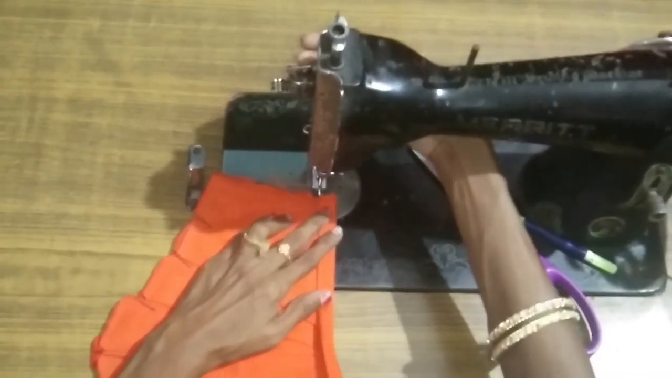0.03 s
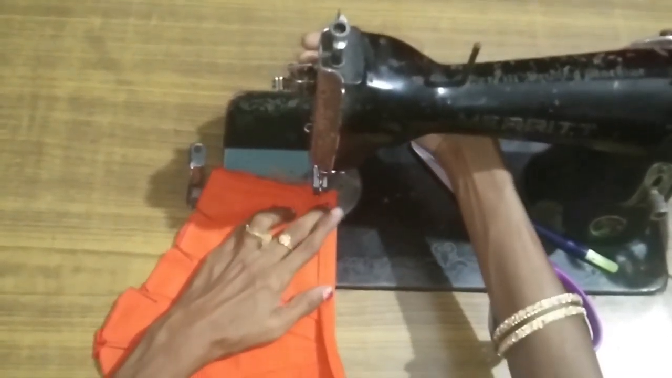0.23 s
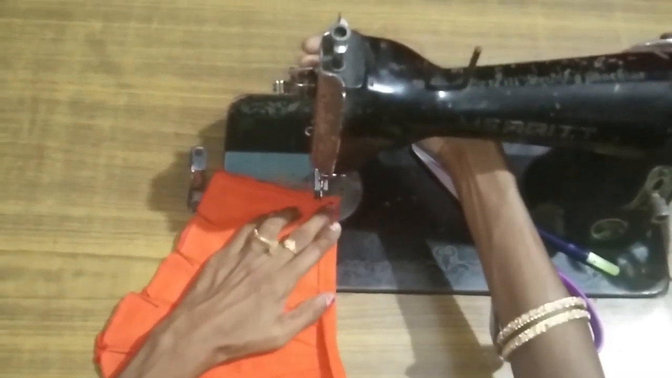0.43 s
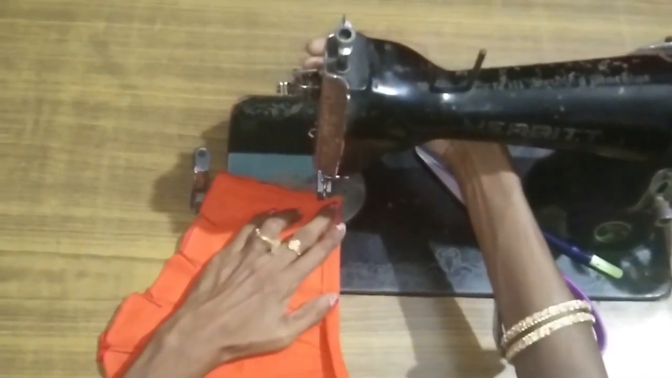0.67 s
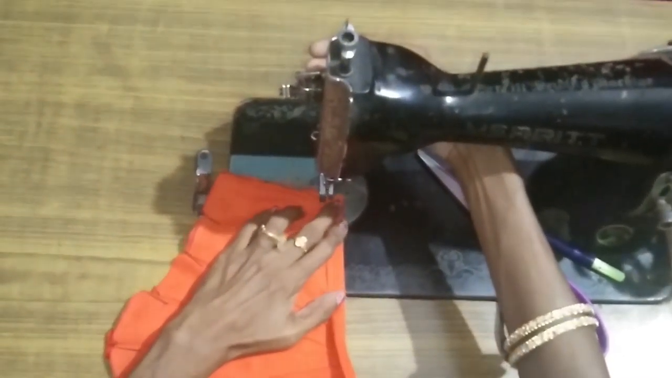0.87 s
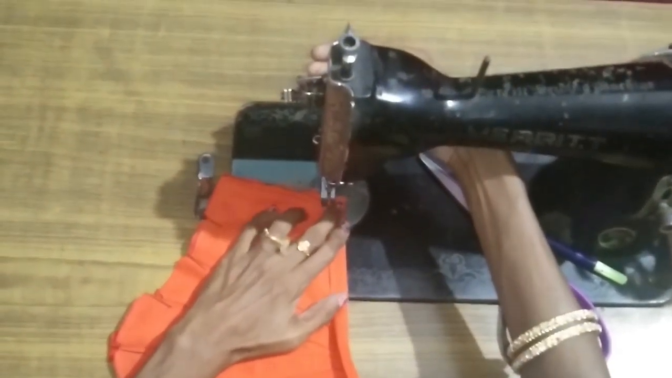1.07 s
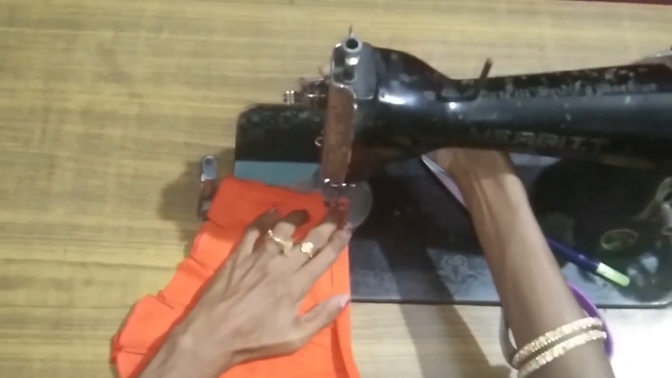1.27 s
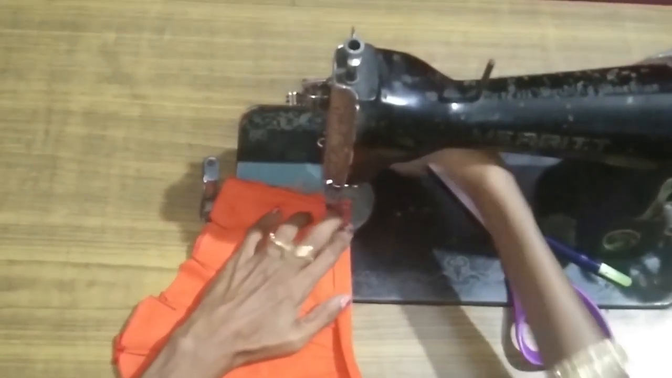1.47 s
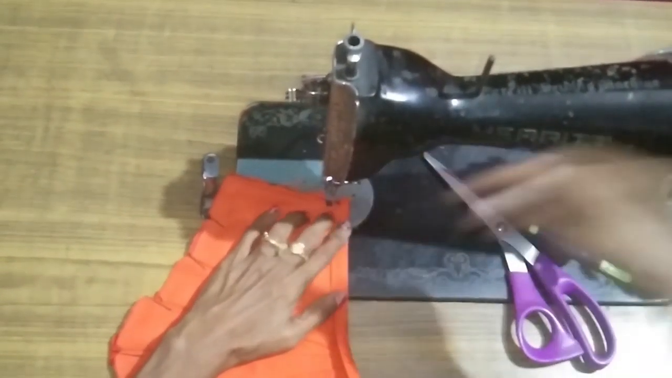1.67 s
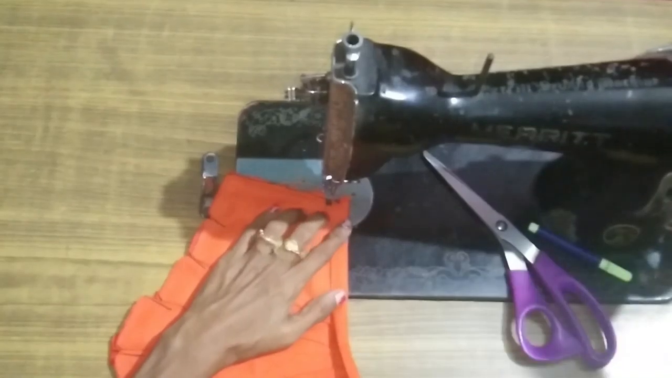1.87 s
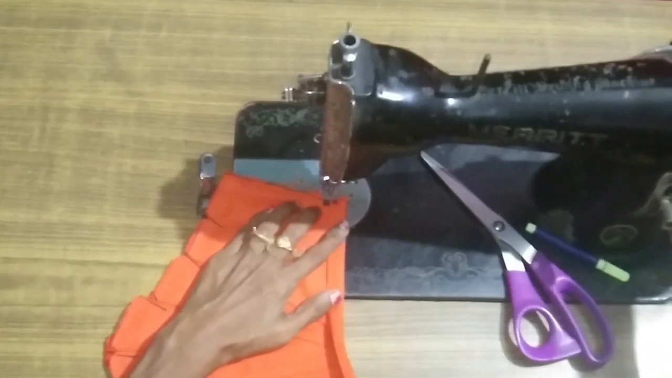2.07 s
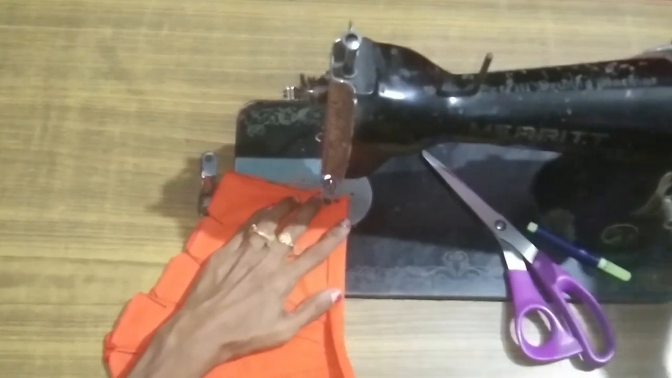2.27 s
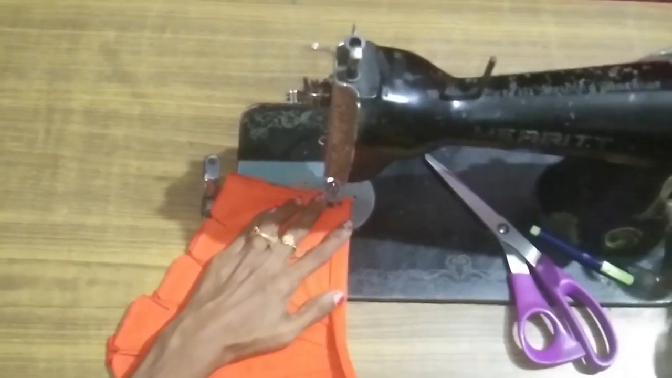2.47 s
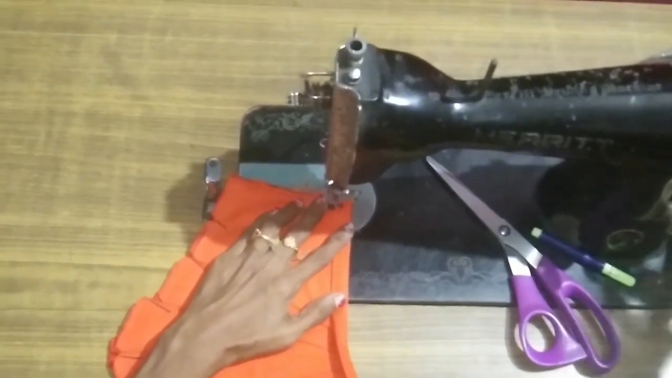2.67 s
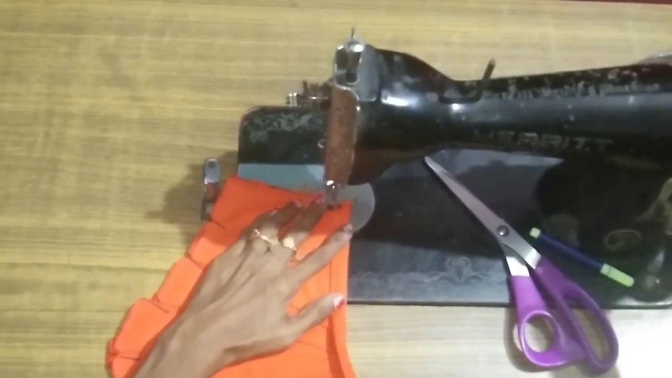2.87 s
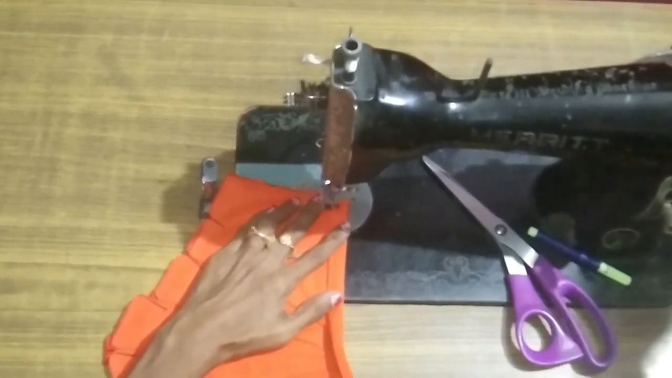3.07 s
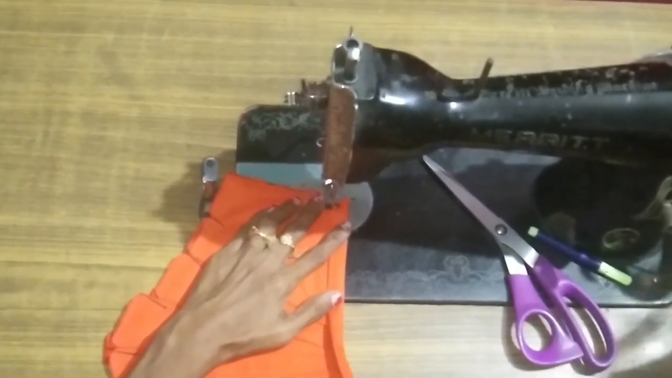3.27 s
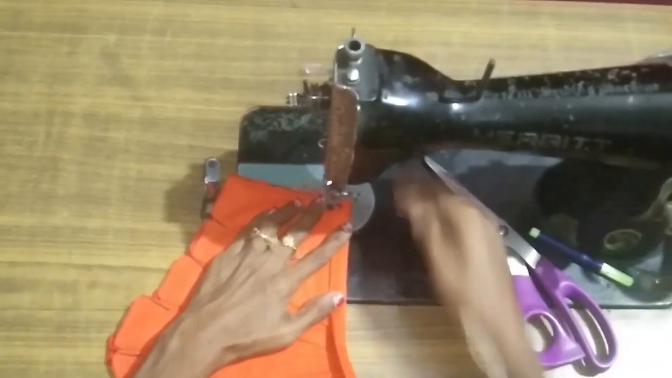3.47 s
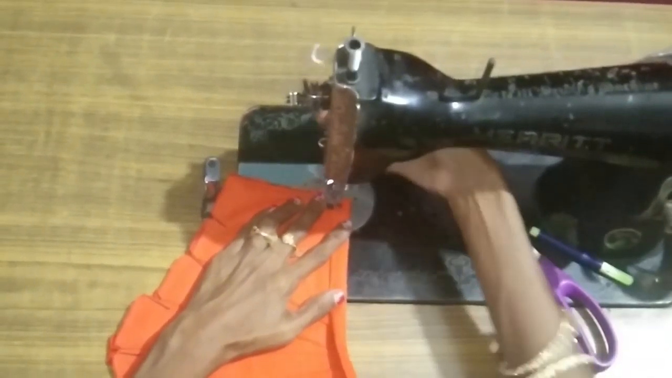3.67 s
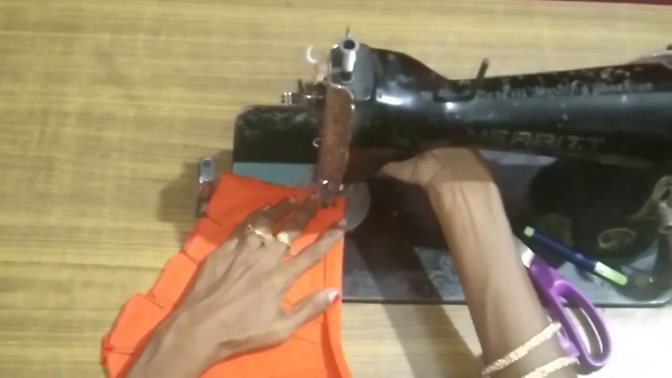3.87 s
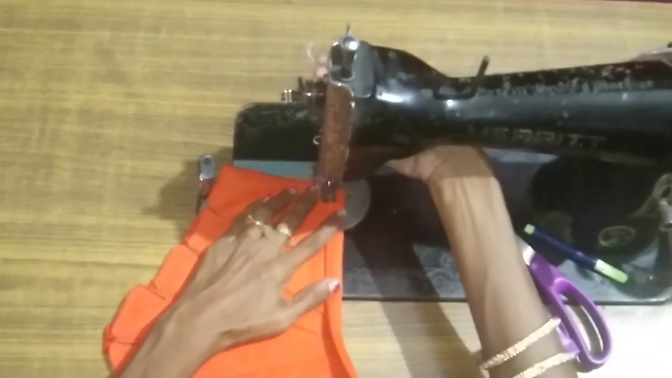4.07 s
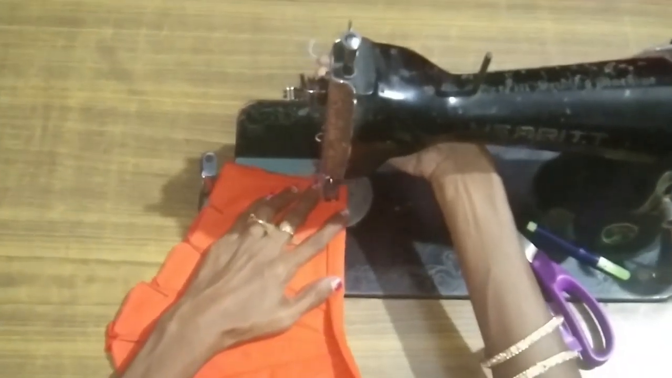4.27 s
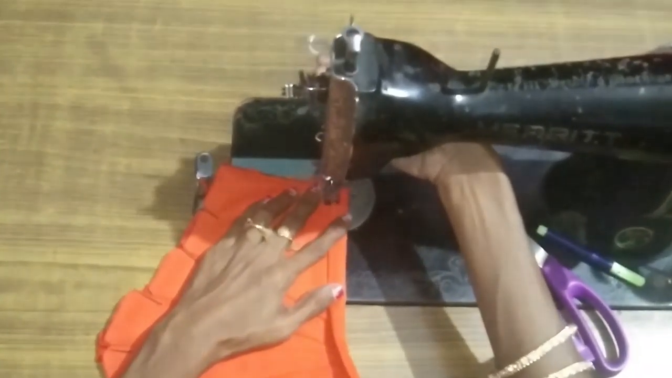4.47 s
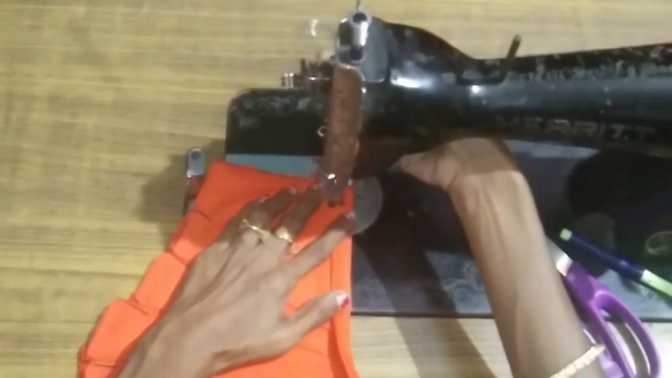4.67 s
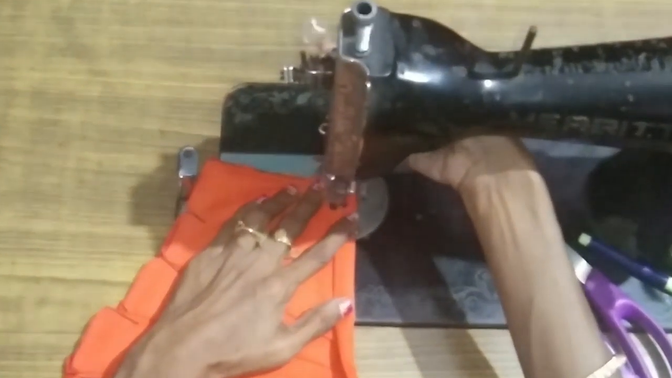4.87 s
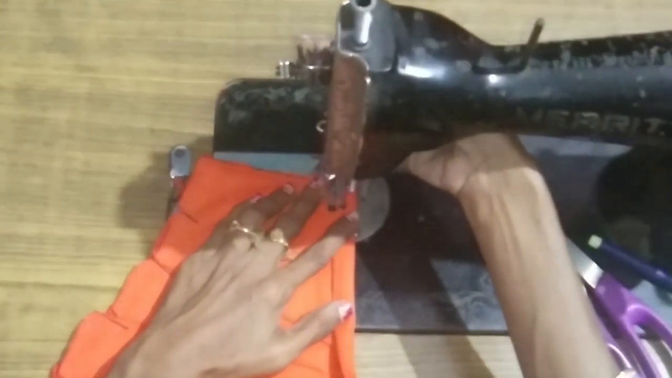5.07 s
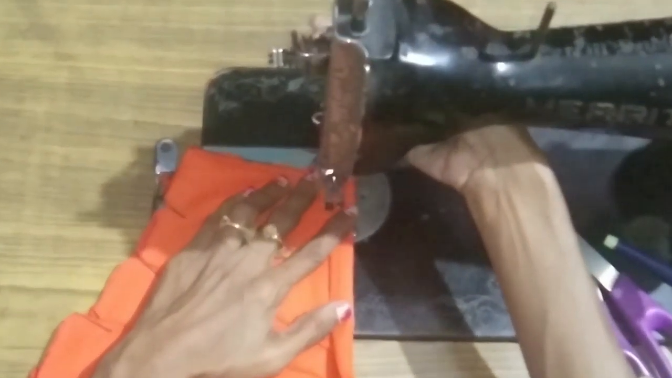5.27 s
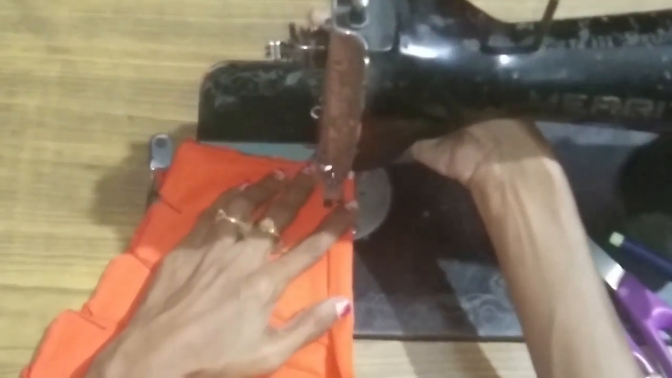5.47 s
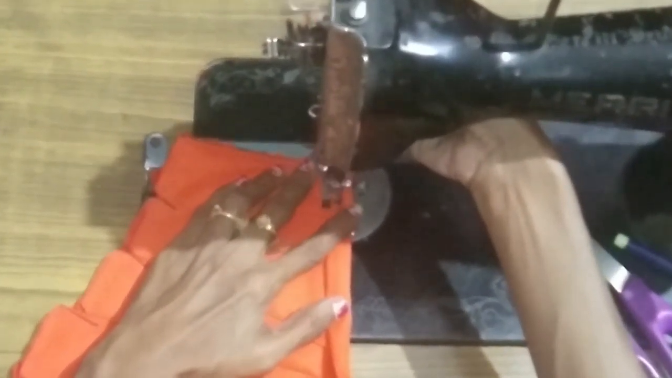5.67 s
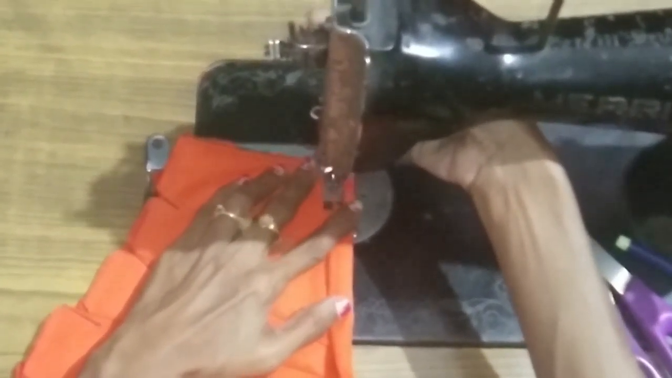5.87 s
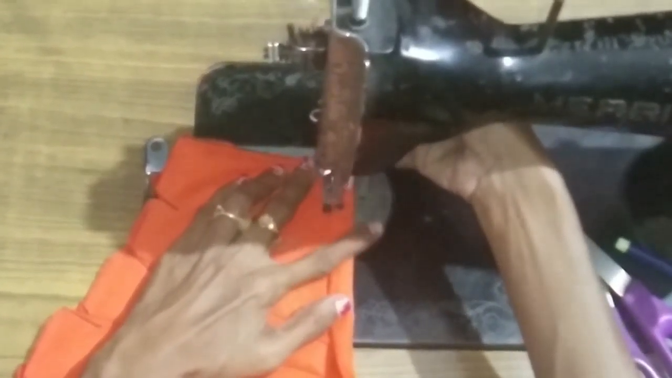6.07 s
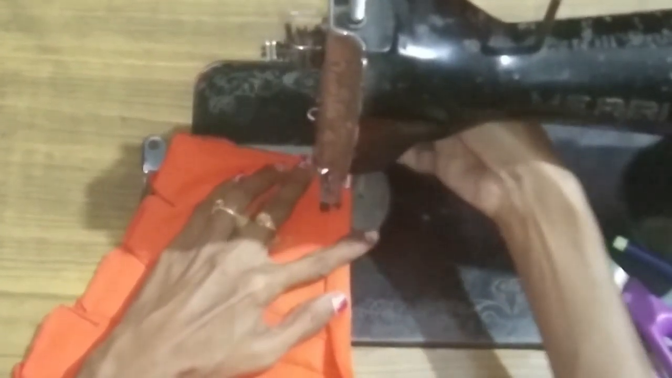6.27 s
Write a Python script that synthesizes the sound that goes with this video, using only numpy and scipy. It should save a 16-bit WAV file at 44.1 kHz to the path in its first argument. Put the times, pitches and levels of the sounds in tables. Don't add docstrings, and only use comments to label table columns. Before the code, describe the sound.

Almost quiet at first: low room tone and tiny brushing sounds. Irregular metal clicks and woody table knocks build, strongest shortly before three seconds. After a slight break in the ambience, a heavy old sewing machine gets going, each stitch a soft thud, sharp clack and softer rattling return, with thin high squeaks early on. It accelerates, then holds an even pace, close-miked with short hard-room reverberation.

```python
import sys
import numpy as np
from scipy import signal
from scipy.fft import rfft, irfft
from scipy.io import wavfile

SR = 44100
rng = np.random.default_rng(int(sys.argv[2]) if len(sys.argv) > 2 else 0)


def unload_wav(signal):
    wavfile.write(
        sys.argv[1],
        SR,
        np.round(np.clip(np.atleast_2d(signal).T, -1, 1) * 32767).astype(np.int16),
    )


def makeup_ratio(level_db):
    decades = np.asarray(level_db, float) / 20
    return 10 ** decades


N = 279594
TIME = np.arange(N) / SR
SCENE_CHANGE_S = 3.172


def at_hz(points, hz):
    table_hz, value = np.transpose(points)
    return np.interp(np.log(hz), np.log(table_hz), value)


def rms_one(x):
    return x / np.sqrt(np.mean(x ** 2) + 1e-20)


def colour(x, spectrum, peaks=(), tilt=((100, 0), (200, 0))):
    hz = np.maximum(np.fft.rfftfreq(4096, 1 / SR), 10)
    db = at_hz(spectrum, hz) + at_hz(tilt, hz)
    for peak_hz, width_hz, peak_db in peaks:
        db = db + peak_db / (1 + (2 * (hz - peak_hz) / width_hz) ** 2)
    cepstrum = irfft(np.log(makeup_ratio(db)))
    cepstrum[1:2048] *= 2
    cepstrum[2049:] = 0
    response = irfft(np.exp(rfft(cepstrum)))
    return signal.fftconvolve(x, response)[:len(x)]


def band(x, low_hz, high_hz):
    edges_hz = [low_hz, min(high_hz, .45 * SR)]
    return signal.sosfilt(signal.butter(2, edges_hz, "band", fs=SR, output="sos"), x)


def ring(x, hz, t60_s):
    r, w = makeup_ratio(-60 / (t60_s * SR)), 2 * np.pi * hz / SR
    return signal.lfilter([0, np.sin(w)], [1, -2 * r * np.cos(w), r * r], x + 1e-18)


def grains(size, per_s, spread_db):
    sizes = makeup_ratio(spread_db * np.minimum(rng.exponential(1, size), 3)) * rng.standard_normal(size)
    return rms_one(sizes * (rng.random(size) < per_s / SR))


def burst(on_s, off_s, db, rise_db_per_s, fall_db_per_s):
    rise_db = rise_db_per_s * np.maximum(on_s - TIME, 0)
    fall_db = fall_db_per_s * np.maximum(TIME - off_s, 0)
    return makeup_ratio(db - rise_db - fall_db)


def add(out, s, x):
    i = round(s * SR)
    out[i:i + len(x)] += x[:N - i]


def blow(rattle_db, swell_s, crack_s):
    t = TIME[:SR // 4]
    age = t / max(1.2 * swell_s, .002)
    swell = (age * np.exp(1 - age)) ** 1.36
    chatter = grains(len(t), 9000, spread_db=1.5)
    crack = signal.lfilter([.78], [1, -.08], rng.choice([-1, 1], len(t))) * np.exp(-t / crack_s)
    return crack + makeup_ratio(rattle_db) * swell * chatter


# frequency [Hz], level [dB per Hz].
IRON = [(290, -36), (500, -3), (1000, -6), (1900, -8), (2200, -3.5), (2900, 0), (3500, 0.5), (3900, -3.5),
        (4800, -4), (7100, 1), (8300, -12.5), (10600, -26), (12700, -35), (14500, -33)]
# frequency [Hz], width [Hz], level [dB].
PARTS = [(650.6, 40, 7), (1226, 290, 4), (1720, 210, 3), (1970, 120, 3), (2216, 110, 4.5), (2666, 210, 2),
         (3000, 33, -12), (3190, 13, 4.5), (3420, 120, 2), (3400, 155, 0.5), (4253, 34, -3.5),
         (4395, 180, 4), (6900, 180, 2), (7570, 47, 2)]


def clacks():
    places = np.zeros((3, N))
    running = whir() * makeup_ratio(-6) * grains(N, 8000, spread_db=0)
    places[0] = colour(running, IRON, PARTS, [(9000, 0), (13500, 1.4)])
    for k, (s, db, dull_db, bright_db, rattle_db, swell_s, top_db) in enumerate(contacts()):
        woken = [(hz, width_hz, max(part_db + 2 * rng.standard_normal(), 0)) for hz, width_hz, part_db in PARTS]
        airy_db = 0.44 * bright_db + 0.43 * rattle_db + 7.5 + top_db
        tilt = [(1300, dull_db + 13.5), (2200, 0.0078), (3800, 0.0059),
                (5500, bright_db + 7), (9000, bright_db + 6.5), (13000, airy_db)]
        force = makeup_ratio(db + 2.81) * blow(rattle_db, swell_s, crack_s=0.0038)
        add(places[k % 3], s, colour(force, IRON, woken, tilt))
    return places


# start [s], peak
# [dB], dull part [dB], bright part [dB], rattle [dB].
EARLY_CLACKS = [(1.4073, -35.5, -16.5, -8.5, -15), (1.5688, -29, -10.5, 1.5, -11.5),
                (2.17, -32, -8.5, -10, -4.5), (2.1894, -42, -2, -6.5, -6.5), (2.4267, -37.5, -15, -1.5, -7),
                (2.4374, -42, -14, -5, -12), (2.474, -30.5, -14, -3, -5), (2.4864, -25.5, -13.5, -10.5, -4),
                (2.5764, -29.5, -9.5, -1.5, -10.5), (2.6962, -17, -16, -5.5, -11),
                (2.7554, -20, -16.5, -12, -4), (2.7698, -19, -16.5, -1, -12), (2.9464, -31, -17, -2, -4),
                (2.9626, -36.5, -12, 5, -11), (3.0022, -25.5, -15, -7, -6), (3.0595, -27.5, -17.5, -22, -12),
                (3.0914, -32.5, -8, -3, -11), (3.1293, -36.5, -18, -12, -1), (3.236, -29, -18, -7, -8),
                (3.2897, -23.5, -16.5, -4.5, -10.5), (3.3994, -50.5, -6.5, 0, 1.5),
                (3.4399, -35, -20, -4.5, -10), (3.572, -38, -17, -5, -3), (3.5826, -23.5, -17, -6, -9)]
# shuttle clack [s], clack [dB], return after [s], return [dB], needle-bar thud [dB].
STITCHES = [(3.6154, -21, .1045, -25.5, -31), (3.8423, -18, .0801, -21.5, -28.5),
            (4.0359, -15.5, .0885, -21.5, -28.5), (4.2408, -15, .0806, -22, -31),
            (4.4324, -17, .0861, -21, -28), (4.6198, -15, .0773, -21.5, -25.5),
            (4.804, -15, .0714, -19.5, -29.5), (4.9703, -14, .0631, -20, -28),
            (5.1264, -15.5, .0689, -20, -29.5), (5.2877, -16.5, .0632, -20.5, -28.5),
            (5.4453, -14.5, .0639, -21, -26), (5.6022, -15, .0667, -20.5, -27.5),
            (5.7613, -14.5, .067, -17.5, -26), (5.9038, -15.5, .0693, -19.5, -26.5),
            (6.0457, -14.5, .0633, -17, -26.5), (6.1903, -17, .0596, -19, -28),
            (6.3324, -16.5, .06, -19, -28)]


def contacts():
    slide = (-20, -6, -4.5, 0.013, -1.5)
    shuttle = (-23, -5.5, -8, 0.0115, -3.5)
    shuttle_return = (-15, -6.5, -3.5, 0.012, 1.5)
    slow_hz, slide_lead_turn = 5.3, 0.097
    rows = [row + (0.012, 0) for row in EARLY_CLACKS]
    for k, ((s, db, after_s, return_db, _), turn_s) in enumerate(zip(STITCHES, turns())):
        fast_hz = max(1 / turn_s - slow_hz, 0)
        dull_db, bright_db, rattle_db, *shape = shuttle
        rows.append((s, db, dull_db, bright_db, rattle_db + 1.2 * fast_hz, *shape))
        soft_db = 1.5 * fast_hz
        dull_db, bright_db, rattle_db, *shape = shuttle_return
        rows.append((s + after_s, return_db - soft_db, dull_db, bright_db, rattle_db + soft_db, *shape))
        if k:
            rows.append((s - slide_lead_turn * turn_s, -24.5 - 7 * fast_hz, *slide))
    return [row for row in rows if row[0] < N / SR]


def turns():
    first_turn_s = 0.31
    s = np.array(STITCHES)[:, 0]
    return np.diff(s, prepend=s[0] - first_turn_s)


def whir():
    s = np.array(STITCHES)[:, 0]
    stitches_per_s = np.interp(TIME, s, 1 / turns())
    return burst(s[1], N / SR, -33 + 2.5 * (stitches_per_s - 5), 200, 0)


# frequency [Hz], level [dB], t60 [s].
BOARD = [(300, -34.5, 0.055), (343.5, 1, 0.073), (398.5, 1.5, 0.052), (659, -4, 0.05)]
# frequency [Hz], level [dB], t60 [s].
LEGS = [(80, 13.5, 0.3), (115, 8, 0.15), (146.4, 11, 0.13), (250, 20, 0.025)]


def thuds():
    out, t = np.zeros(N), TIME[:SR // 3]
    for s, db, knock_hz, deep_db in jolts():
        push = np.exp(-t / 0.00071) / (0.002 * SR)
        tremble = t / 0.019 * np.exp(1 - t / 0.011) * rng.standard_normal(len(t))
        shudder = makeup_ratio(1.5) * band(push + makeup_ratio(-32) * tremble, 295, 1500)
        sound = makeup_ratio(3) * ring(shudder, knock_hz, .045)
        for modes, force in ((BOARD, makeup_ratio(-4.5) * shudder), (LEGS, makeup_ratio(deep_db - 8) * push)):
            for k, (hz, mode_db, t60_s) in enumerate(modes):
                strength = (-1) ** k * makeup_ratio(mode_db + rng.normal(0, 2.5))
                sound = sound + strength * ring(force, hz, t60_s)
        add(out, s, makeup_ratio(db) * sound)
    return band(band(band(out, 73, 1270), 73, 1500), 56, 2600)


# start [s], peak [dB], knock [Hz], deep part [dB].
HAND_THUDS = [
    (1.571, -28, 330, -20),
    (2.189, -32, 328, -15),
    (2.49, -30.5, 460, -33),
    (2.684, -23.5, 440, -13),
    (2.773, -31, 450, -10),
    (3.0, -31, 450, -24),
    (3.099, -36.5, 360, -17),
    (3.229, -36, 438, -16),
    (3.299, -36.5, 353, -24),
]


def jolts():
    thud_lead_turn, jolt_lag_s = 0.157, 0.003
    clack_jolt_db, return_jolt_db = -22, -12
    deep_db = (-13, -8, -13)
    rows = list(HAND_THUDS)
    knocks_hz = 380 + 35 * rng.uniform(-1, 1, (len(STITCHES), 3))
    for (s, db, after_s, return_db, thud_db), turn_s, knock_hz in zip(STITCHES, turns(), knocks_hz):
        times_s = s - thud_lead_turn * turn_s, s + jolt_lag_s, s + after_s + jolt_lag_s
        levels_db = thud_db, db + clack_jolt_db, return_db + return_jolt_db
        rows += zip(times_s, levels_db, knock_hz, deep_db)
    return [row for row in rows if row[0] < N / SR]


# start [s], peak [dB].
SQUEAKS = [
    (2.272, -46),
    (3.86, -34),
    (3.94, -44),
    (4.048, -35),
    (4.138, -35),
]


def squeak():
    squeak_hz, half_width_hz = 6925, 14
    whistle = band(rng.standard_normal(N), squeak_hz - half_width_hz, squeak_hz + half_width_hz)
    catches = sum(burst(s, s, db, rise_db_per_s=900, fall_db_per_s=190) for s, db in SQUEAKS)
    return catches * rms_one(whistle)


# start [s], tick [dB], centre [Hz], width [Hz], rustle after it [dB].
TICKS = [(0.431, -51, 960, 200, -68), (1.179, -49, 6800, 2800, -88), (1.405, -42, 1430, 700, -54),
         (1.571, -36, 930, 200, -68), (1.573, -36, 5070, 2470, -41), (1.752, -49, 7000, 1500, -60),
         (1.753, -62, 14200, 2600, -64), (1.805, -47, 7100, 2980, -56.5), (1.999, -33, 4200, 1090, -58.5),
         (1.9995, -43, 6500, 1200, -72), (2.768, -23, 4580, 250, -43), (3.004, -30, 4550, 250, -47),
         (3.09, -40, 820, 247, -53), (3.44, -50, 1550, 200, -57)]


def ticks():
    out = np.zeros(N)
    for s, db, hz, width_hz, tail_db in TICKS:
        add(out, s, banded_blow(db, hz, width_hz, tail_db - db, swell_s=0.01))
    return out


# start [s], level [dB], centre [Hz], width [Hz], swell [s].
RUSTLES = [(0.0, -64, 1050, 120, .05), (0.0, -66, 3400, 3000, .039), (0.421, -62, 1760, 900, .033),
           (0.592, -56, 5100, 1100, .025), (0.66, -64, 5100, 1100, .07), (0.601, -67, 6960, 2950, .033),
           (1.168, -57.5, 2940, 890, .027), (1.808, -64, 12000, 6000, .011), (1.93, -73, 14200, 2600, .016),
           (2.585, -49, 300, 250, .019), (3.47, -73, 13000, 5000, .03)]


def rustles():
    start_db = -4
    out = np.zeros(N)
    for s, db, hz, width_hz, swell_s in RUSTLES:
        add(out, s, banded_blow(db + start_db, hz, width_hz, -start_db, swell_s))
    return out


def banded_blow(db, hz, width_hz, rattle_db, swell_s):
    force = makeup_ratio(db) * blow(rattle_db, swell_s, crack_s=0.0018)
    return band(force, hz - width_hz / 2, hz + width_hz / 2) * np.sqrt(SR / 2 / width_hz)


def motor_hum():
    gain = burst(0.09, 0.31, -55, rise_db_per_s=300, fall_db_per_s=300)
    return gain * np.sqrt(2) * np.sin(2 * np.pi * 150.7 * TIME)


# frequency [Hz], t60 [s].
ROOM_T60 = [(200, 0.18), (700, 0.33), (2000, 0.47), (5000, 0.29), (12000, 0.36)]


def room(x, wet_db):
    t, tail = TIME[:SR // 2], 0
    for hz in 60 * 2. ** np.arange(9):
        octave = band(rng.standard_normal(len(t)), hz / np.sqrt(2), hz * np.sqrt(2))
        tail = tail + octave * makeup_ratio(-60 * t / at_hz(ROOM_T60, hz))
    tail = tail * np.clip((t - .007) / 0.0053, 0, 1)
    return x + makeup_ratio(wet_db) * signal.fftconvolve(x, tail / np.linalg.norm(tail))[:N]


# frequency [Hz], level [dB per Hz].
AIR = [(20, -34), (45, -11), (80, -3.5), (143, -0.5), (214, -5), (300, 1), (490, -4.5), (760, -9),
       (1900, -10.5), (4300, -15), (7300, -15.5), (8500, -30.5), (10500, -40), (14500, -42)]


def room_tone():
    level_db = -52.5 - 3.5 * (TIME > SCENE_CHANGE_S)
    return makeup_ratio(level_db) * rms_one(colour(rng.standard_normal(N), AIR))


def scene():
    heard = sum(room(place, wet_db=-1.1) for place in clacks())
    heard = heard + room(thuds(), wet_db=-5) + room(ticks() + rustles(), wet_db=-2.5)
    chop_s = [SCENE_CHANGE_S - 1 / SR, SCENE_CHANGE_S, 3.225, 3.232]
    heard *= makeup_ratio(np.interp(TIME, chop_s, [2.5, -9.5, -1, 2.5]))
    return (heard + squeak() + motor_hum() + room_tone())[None]


def band_limit(x):
    return signal.sosfilt(signal.butter(12, 16230, fs=SR, output="sos"), x)


def record(dry):
    limit, cutoff_hz = 0.42, 15500
    rounded = limit * np.tanh(dry / limit)
    mix = signal.sosfilt(signal.ellip(10, 1, 60, cutoff_hz, fs=SR, output="sos"), rounded)
    return band_limit(mix)


dry = scene()
out = record(dry)
unload_wav(out)
```